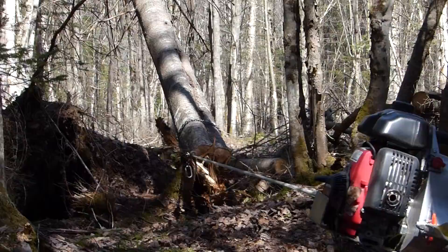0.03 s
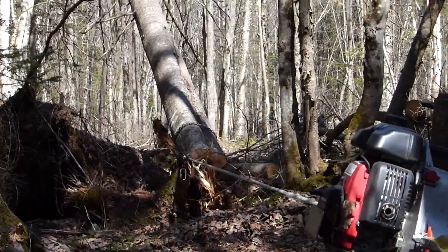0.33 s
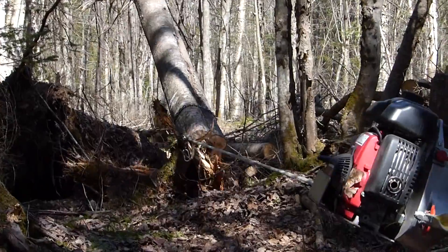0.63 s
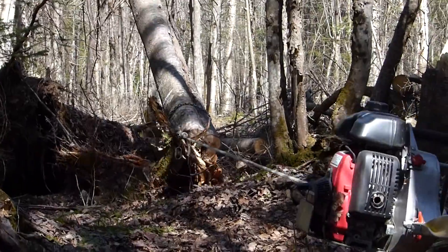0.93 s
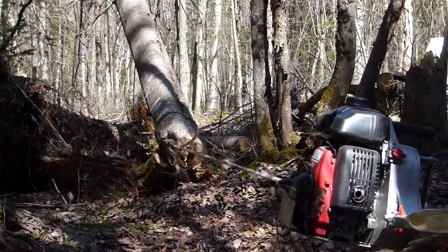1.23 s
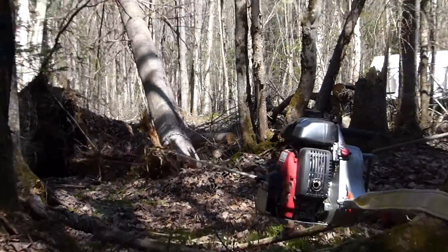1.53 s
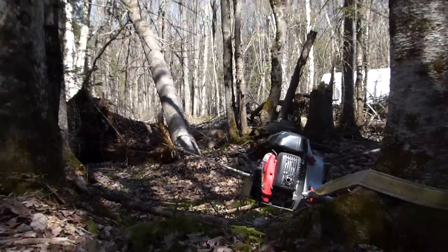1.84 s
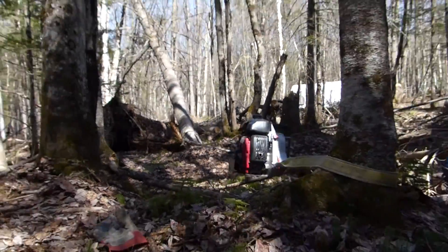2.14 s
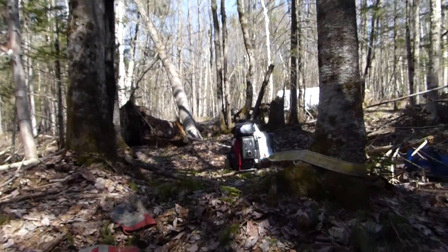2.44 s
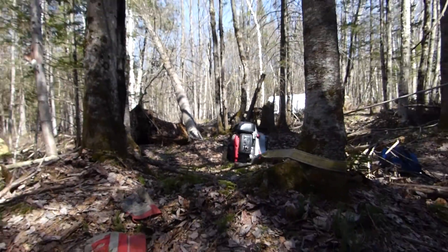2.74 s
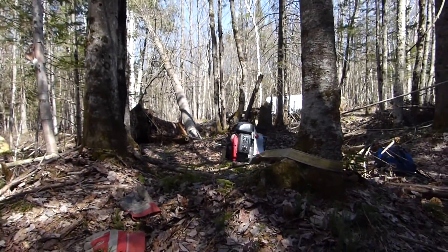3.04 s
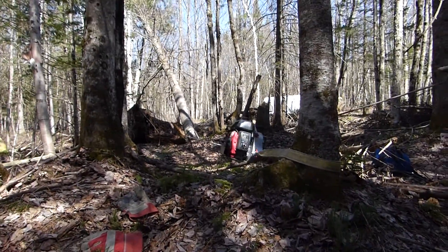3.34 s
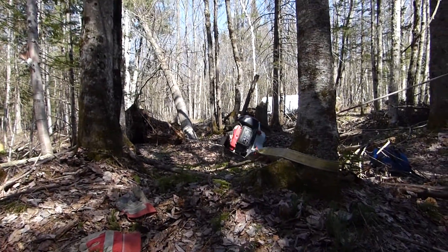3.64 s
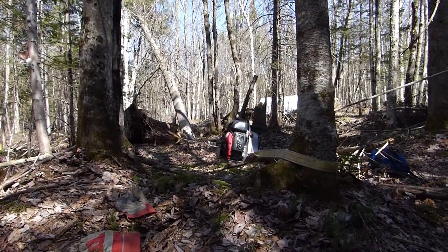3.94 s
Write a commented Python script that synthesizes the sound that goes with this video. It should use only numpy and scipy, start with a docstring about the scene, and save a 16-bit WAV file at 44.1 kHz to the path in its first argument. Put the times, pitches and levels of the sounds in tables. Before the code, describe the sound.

A small petrol engine runs a rope winch among trees, droning and rattling with a slight echo. The taut rope ticks a few times, and a high, unsteady squeal rises over the engine in the second half.

```python
"""An engine drone cuts in abruptly: a small single-cylinder four-stroke driving a rope winch in a bare
forest, its speed sagging with the load. Exhaust pulses boom through the muffler, the piston knocks the
crankcase twice a cycle, valves and gears clatter and whine, a cover buzzes and the taut rope ticks.
Past halfway the loaded winch squeals for a second, and automatic gain control ducks the engine under it.
The trunks add a short echo."""
import sys
import numpy as np
from scipy import signal
from scipy.fft import rfft, irfft
from scipy.io import wavfile
from scipy.ndimage import uniform_filter1d

SR = 44100
rng = np.random.default_rng(int(sys.argv[2]) if len(sys.argv) > 2 else 0)


def pcm_store(signal):
    """Save signal as 16-bit PCM."""
    levels = np.round(np.clip(np.atleast_2d(signal), -1, 1) * 32767)
    wavfile.write(sys.argv[1], SR, levels.astype(np.int16).T)


N = 176400
TIME = np.arange(N) / SR
START_S = .366
EXHAUST_AT, KNOCK_AT = 0.2704, 0.1701  # share of the engine cycle
SIDES = np.array([[.5], [-.5]])  # left, right


def undb(db):
    """Decibels to gain."""
    return 10 ** (np.asarray(db) / 20)


def unit(x):
    """Scale to rms 1."""
    return x / np.sqrt(np.mean(x ** 2))


def curve(rows, column=1):
    """One column of a table, joined by straight lines in time."""
    rows = np.array(rows)
    return np.interp(TIME, rows[:, 0], rows[:, column])


def per_bin(points):
    """(Hz, value) points spread over the frequency axis."""
    hz, value = np.array(points).T
    return np.interp(np.log(np.arange(N // 2 + 1) * SR / N + 1), np.log(hz), value)


def causal(db):
    """Minimum-phase response with these gains."""
    cepstrum = irfft(np.log(undb(db)))
    cepstrum[1:len(cepstrum) // 2] *= 2
    cepstrum[len(cepstrum) // 2 + 1:] = 0
    return np.exp(rfft(cepstrum))


def colour(x, points):
    """Filter by an EQ curve; rms 1."""
    return unit(irfft(rfft(x) * causal(per_bin(points)), N))


def ring(x, modes):
    """Drive a set of resonances, neighbours in opposite polarity; rms 1."""
    return unit(sum((-1) ** k * undb(db) * signal.lfilter(*signal.iirpeak(hz, hz / width, fs=SR), x)
                    for k, (hz, width, db) in enumerate(modes)))


def noise():
    """White noise."""
    return rng.standard_normal(N)


def drift(rate_hz):
    """Smooth random modulation; rms 1."""
    hold = int(SR / rate_hz)
    steps = np.repeat(rng.standard_normal(N // hold + 1), hold)
    return unit(uniform_filter1d(steps, hold)[:N])


def blows(cycles, at, scatter_db, decay_cycles, jitter_s=0):
    """One uneven blow a cycle: its clicks, and the burst of rasp that follows each."""
    count = np.arange(int(cycles[-1]) + 2)
    late, spread = rng.standard_normal((len(count), 2)).T
    size = undb(scatter_db * spread)
    where = np.interp(count + at, cycles, np.arange(N), left=0, right=0) + late * jitter_s * SR
    near = where.astype(int)[:, None] + np.arange(-7, 9)
    spikes = size[:, None] * np.sinc(near - where[:, None]) * (near > SR * START_S / 2)
    clicks = np.bincount((near % N).ravel(), spikes.ravel(), N)
    burst = size[np.floor(cycles - at).astype(int)] * np.exp(-((cycles - at) % 1) / decay_cycles)
    return unit(clicks), unit(burst * noise())


# EQ of the forest echo. Each row: frequency in Hz, gain in dB.
ECHO_EQ = [(60, 1), (300, -12.5), (1100, 8), (4500, -25), (7000, 3), (13000, 0.5)]


def forest_echo(x, t60_s=0.47, level_db=-10.5):
    """Trunks scatter a short, thin echo, different on each side."""
    age = TIME[:SR // 2]
    tail = rng.standard_normal((2, len(age))) * undb(-60 * age / t60_s)
    tail /= np.sqrt(np.sum(tail ** 2, axis=1, keepdims=True))
    send = irfft(rfft(x) * undb(per_bin(ECHO_EQ)), N)
    return undb(level_db) * signal.fftconvolve(send[None], tail, axes=1)[:, :N]


# Stereo balance. Each row: frequency in Hz, left over right in dB.
PORT_BALANCE = [(100, 2.5), (240, 6.5), (400, 3.5), (750, 3.5), (950, 1.5), (1300, 5.5), (1520, -4),
                (2000, 0.5), (3000, -5.5), (3600, -1), (10000, 3), (14000, 0.5)]
# Stereo phase. Each row: frequency in Hz, lead of the left side in radians.
PORT_PHASE = [(160, 0.098), (300, -0.92), (1300, -0.21), (1550, 1), (1900, -0.46), (7000, 0.27),
              (8500, -1.44), (14000, -0.51)]
# Width, scaling both of these. Each row: time in seconds, gain of the side signal.
STEREO_WIDTH = [(1.8, 1.41), (3.3, 0.65)]


def stereo_image(x):
    """Off-axis sound reaches two microphone ports unequally in level and phase."""
    balance = undb(SIDES * per_bin(PORT_BALANCE))
    lead = np.exp(1j * SIDES * per_bin(PORT_PHASE))
    direct = irfft(rfft(x) * balance * lead, N)
    mid = direct.mean(axis=0)
    return mid + curve(STEREO_WIDTH) * (direct - mid)


# Ring of a loose part. Each row: pitch in Hz, bandwidth in Hz, relative level in dB.
LOOSE_PART_MODES = [(4380, 370, -1), (7600, 500, -1), (10070, 420, 1.5), (11360, 1000, -5.5)]


def loose_part(cycles, level_db=-38):
    """A loose part of the drive ticks brightly on every second cycle."""
    _, rasp = blows(cycles / 2, at=0.18, scatter_db=0.5, decay_cycles=0.11)
    return ring(rasp, LOOSE_PART_MODES) * undb(level_db)


# Bright hiss of air. Each row: frequency in Hz, relative level in dB.
HISS_EQ = [(1000, -25.5), (2800, -16), (3250, -4.5), (3700, -4), (4400, -2.5), (5500, -3), (7000, -4.5),
           (7900, -6.5), (8700, -12.5), (13000, -18.5), (15500, -25)]


def cooling_air(cycles):
    """Cooling air hisses, surging with every exhaust stroke."""
    _, puff = blows(cycles, EXHAUST_AT, scatter_db=2.3, decay_cycles=0.55)
    return colour(puff + noise(), HISS_EQ)


# Rope ticks. Each row: start in seconds, pitch in Hz, level in dB.
ROPE_TICKS = [(1.197, 2300, -14), (2.183, 4550, -16), (3.346, 4400, -14), (3.924, 4430, -13.5)]


def rope_ticks(decay_s=.003, crack_db=-10):
    """The taut rope and its fittings give sharp ticks, each a ping with a crack of hiss."""
    out = 0
    for start, hz, db in ROPE_TICKS:
        age = np.maximum(TIME - start, 0)
        envelope = undb(db) * (age > 0) * np.exp(-age / decay_s)
        crack = undb(crack_db) * colour(noise(), HISS_EQ)
        out = out + envelope * (np.sin(2 * np.pi * hz * age) + crack)
    return out


# Fader of the two leading gear tones. Each row: time in seconds, upper tone in dB, lower tone in dB.
WHINE_LEVELS = [(.4, -28.5, -55), (.86, -30, -53), (1.05, -40, -40), (1.68, -41, -46), (1.78, -47, -27),
                (2.1, -39, -37.5), (2.74, -40, -28), (3.16, -48, -51), (3.2, -28, -52), (3.7, -26.5, -36),
                (4, -30, -44)]
# Fainter gear tones. Each row: multiple of the firing rate, level in dB.
FAINT_GEAR_TONES = [(28, -42), (30, -47), (32, -42)]


def gear_whine(cycles, upper_order=38, lower_order=34, flutter_db=1.0, wobble_rad=.2):
    """Meshing teeth sing at multiples of the firing rate and throb with each shaft turn."""
    throb = 1 + .25 * np.cos(4 * np.pi * (cycles - KNOCK_AT - .06))
    leading = [(upper_order, curve(WHINE_LEVELS, 1)), (lower_order, curve(WHINE_LEVELS, 2))]
    out = 0
    for order, db in leading + FAINT_GEAR_TONES:
        flutter = undb(flutter_db * drift(60))
        tone = np.sin(2 * np.pi * order * cycles + wobble_rad * drift(80))
        out = out + undb(db) * unit(throb * flutter * tone)
    return out


# Ring of the cover. Each row: pitch in Hz, bandwidth in Hz, relative level in dB.
COVER_MODES = [(4572, 310, 0)]
# Swells of its buzz. Each row: time in seconds, level in dB.
COVER_SWELLS = [(.4, -31), (.8, -29), (1.22, -24), (1.55, -28), (1.7, -24), (1.92, -28.5), (2.18, -23.5),
                (2.4, -30.5), (3.1, -27.5), (4, -30.5)]


def cover_buzz(cycles):
    """A metal cover, shaken once a cycle, buzzes with a slight throb every three cycles."""
    _, rasp = blows(cycles, at=.55, scatter_db=1, decay_cycles=1)
    throb = 1 + 0.083 * np.cos(2 * np.pi * cycles / 3)
    buzz = ring(rasp * throb, COVER_MODES)
    return ring(buzz, COVER_MODES) * undb(curve(COVER_SWELLS))  # a second pass sharpens the peak


# The long squeal. Each row: time in seconds, pitch in Hz, level in dB.
LONG_SQUEAL = [(2.228, 7300, -41), (2.247, 7200, -13.5), (2.298, 7105, -19), (2.345, 7270, -17),
               (2.375, 7430, -33), (2.468, 7340, -30), (2.532, 7262, -16.5), (2.648, 7241, -12.5),
               (2.702, 7346, -23), (2.824, 7579, -20), (2.844, 7580, -33), (2.974, 7639, -20.5),
               (2.998, 7603, -28), (3.03, 7555, -15.5), (3.08, 7570, -15.5), (3.11, 7600, -30),
               (3.16, 7645, -28)]
# Thin squeaks just before and after it, one list each. Each row: time in seconds, pitch in Hz, level in dB.
THIN_SQUEAKS = [
    [(2.11, 11350, -42), (2.16, 10900, -27), (2.245, 10760, -36)],
    [(3.295, 7680, -39), (3.325, 7636, -32), (3.37, 7580, -39)],
]


def winch_squeal(rows, wobble=0.00123, flutter_db=2.5, left_db=2.5, left_lead_rad=0.71):
    """Friction in the loaded winch holds one high, unsteady tone."""
    hz = curve(rows) * (1 + wobble * drift(150))
    phase = 2 * np.pi * np.cumsum(hz) / SR
    gate = uniform_filter1d(1. * ((TIME > rows[0][0]) & (TIME < rows[-1][0])), size=200)
    gain = np.sqrt(2) * gate * undb(curve(rows, 2) + flutter_db * drift(50))
    return gain * undb(left_db * SIDES) * np.sin(phase + left_lead_rad * SIDES)


# Breath of the muffler. Each row: frequency in Hz, relative level in dB.
GAS_EQ = [(30, -37), (100, -25.5), (500, -14), (750, -4), (950, 1.5), (1100, -5.5), (1400, -2), (1600, -9),
          (1950, -3.5), (2700, -11), (6000, -50.5)]


def gas_rush(cycles, steady_gain=2.1):
    """Gas streams from the muffler, with a puff on every exhaust stroke."""
    _, puff = blows(cycles, EXHAUST_AT, scatter_db=2.3, decay_cycles=0.67)
    return colour(puff + steady_gain * noise(), GAS_EQ)


# Ring of the crankcase. Each row: pitch in Hz, bandwidth in Hz, relative level in dB.
CRANKCASE_MODES = [(2154, 96, -5), (2330, 105, -3), (2580, 30, -10), (3019, 30, -10)]


def piston_knock(cycles, rasp_db=2.5):
    """The piston slaps once a shaft turn, twice a cycle, and rings the crankcase."""
    clicks, rasp = blows(2 * cycles, 2 * KNOCK_AT, scatter_db=0.1, decay_cycles=0.75, jitter_s=.00003)
    return ring(clicks + undb(rasp_db) * rasp, CRANKCASE_MODES)


# Rhythm of the valves and gears. Each row: position as a share of the cycle, relative level in dB.
VALVE_TAPS = [(0, -4.5), (0.299, -9.5), (0.389, -9), (.55, -3.5), (.78, -4.5)]
# Ring of the housing. Each row: pitch in Hz, bandwidth in Hz, relative level in dB.
HOUSING_MODES = [(3896, 28, -6), (4250, 105, -3), (5080, 74, 3), (5770, 110, -5), (6240, 156, -4.5),
                 (6715, 132, -3.5), (7410, 540, -8), (10450, 280, -14.5), (11470, 290, -20)]


def valve_clatter(cycles, click_db=-10.5, low_cut_hz=3180, air_db=-2):
    """Valves and gears tap the housing at set points of the cycle, over the cooling air."""
    taps = 0
    for at, db in VALVE_TAPS:
        clicks, rasp = blows(cycles, at, scatter_db=1, decay_cycles=0.21, jitter_s=.00006)
        taps = taps + undb(db) * (rasp + undb(click_db) * clicks)
    taps = signal.sosfilt(signal.butter(6, low_cut_hz, "high", fs=SR, output="sos"), taps)
    return unit(ring(taps, HOUSING_MODES) + undb(air_db) * cooling_air(cycles))


# Harmonics of the drone. Each row: multiple of the firing rate, relative level in dB.
DRONE_HARMONICS = [(1, -29.5), (2, -2), (3, -9), (4, -6), (5, -3.5), (6, -3.5), (7, -15), (8, -7.5),
                   (9, -4), (10, -8.5), (11, -6), (12, -2), (13, -16.5), (14, -5.5)]
# Muffler resonances they slide through. Each row: centre in Hz, bandwidth in Hz, boost in dB.
MUFFLER_PEAKS = [(359.3, 22, 5), (508, 23, 9)]


def exhaust_drone(cycles, firing_hz, free_run_hz=59.8, load_db_per_hz=1.0, shaft_db=1.5):
    """Each firing sends a pressure pulse through the muffler, harder as the speed sags."""
    orders, db = np.array(DRONE_HARMONICS).T
    pulse = causal(np.interp(np.arange(65), orders, db))
    load = undb(load_db_per_hz * (free_run_hz - firing_hz))
    wave = 0
    for order in orders:
        boom_db = sum(boost_db / (1 + (2 * (order * firing_hz - hz) / width) ** 2)
                      for hz, width, boost_db in MUFFLER_PEAKS)
        push = undb(shaft_db) if order == 2 else load  # the shaft's hum ignores the load
        harmonic = np.real(pulse[int(order)] * np.exp(2j * np.pi * order * (cycles - EXHAUST_AT)))
        wave = wave + undb(boom_db) * push * harmonic
    flutter_db = .5 * drift(60)
    return unit(wave) * undb(flutter_db)


# Engine speed. Each row: time in seconds, firings per second.
FIRING_RATE = [(0.38, 61.5), (0.71, 61.8), (0.8, 60.2), (1.04, 62.7), (1.25, 62.7), (1.61, 61.9),
               (1.74, 63.2), (1.89, 63.3), (2.04, 62.2), (2.22, 62.5), (2.36, 63.5), (2.48, 60.2),
               (2.68, 63.9), (2.87, 61.1), (3.1, 62.4), (3.25, 60.4), (3.41, 61.0), (3.8, 59.9),
               (3.9, 59.0), (4.0, 59.5)]
# Engine faders. Each row: time in seconds, then drone, gas, knock and clatter levels in dB.
ENGINE_MIX = [(.4, -27, -28, -27, -20), (1.2, -28, -28, -27.5, -20.5), (1.6, -28, -30, -27, -20),
              (2.1, -29.5, -30, -29.5, -23), (2.8, -29.5, -31, -30, -23), (3.3, -30, -31.5, -28.5, -23),
              (3.95, -32, -30.5, -29, -23)]


def engine_and_winch(speed_wander=0.00097):
    """One crankshaft times every engine layer; the rope ticks on top."""
    firing_hz = curve(FIRING_RATE)
    cycles = np.cumsum(firing_hz * (1 + speed_wander * drift(25))) / SR
    layers = (exhaust_drone(cycles, firing_hz), gas_rush(cycles),
              piston_knock(cycles), valve_clatter(cycles))
    engine = sum(layer * undb(curve(ENGINE_MIX, k + 1)) for k, layer in enumerate(layers))
    return engine + gear_whine(cycles) + loose_part(cycles) + cover_buzz(cycles) + rope_ticks()


def scene():
    """The machine in stereo with its forest echo, under the dry squeal and squeaks."""
    machine = engine_and_winch()
    bed = stereo_image(machine) + forest_echo(machine)
    return bed + winch_squeal(LONG_SQUEAL) + sum(winch_squeal(rows) for rows in THIN_SQUEAKS)


def record(dry, threshold_db=-18, duck_slope=0.76, response_s=0.069, top_hz=15600):
    """The sound cuts in, gain control ducks loud moments and a steep filter takes off the top."""
    pole = np.exp(-1 / (response_s * SR))
    level = np.sqrt(signal.lfilter([1 - pole], [1, -pole], np.mean(dry ** 2, axis=0)))
    gain = np.maximum(level / undb(threshold_db), 1) ** -duck_slope
    high_cut = signal.ellip(10, .2, 80, top_hz, fs=SR, output="sos")
    return signal.sosfilt(high_cut, dry * gain * (TIME > START_S))


dry = scene()
out = record(dry)
pcm_store(out)
```